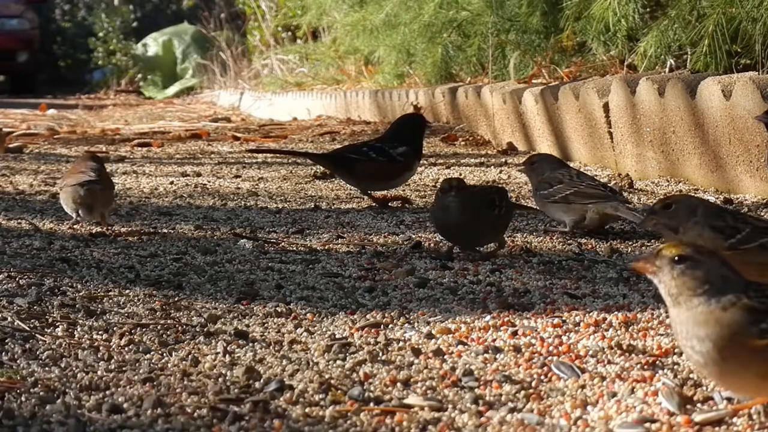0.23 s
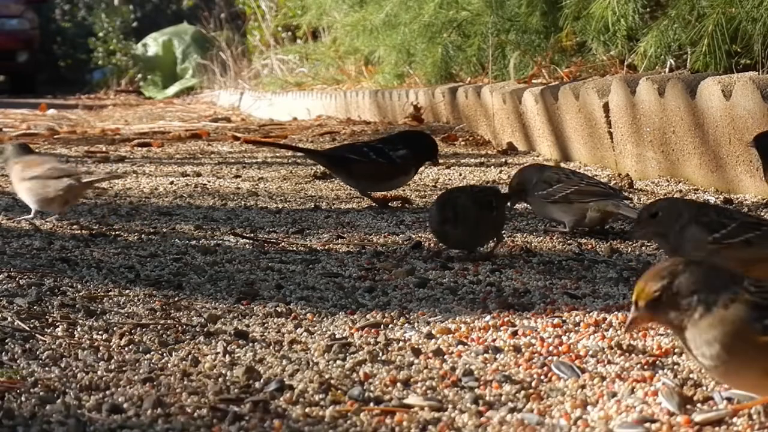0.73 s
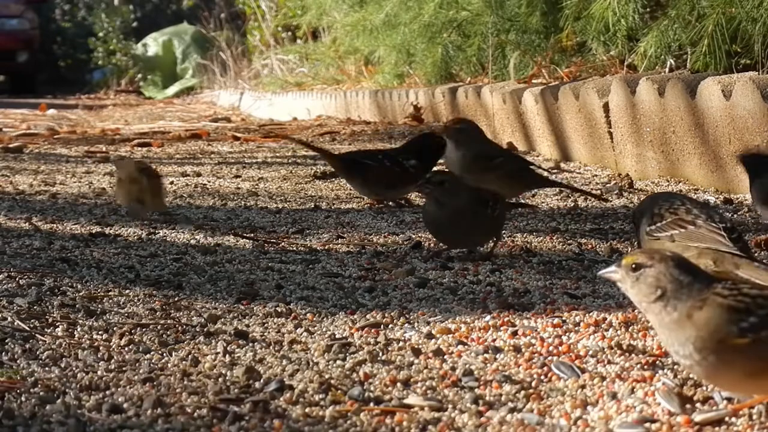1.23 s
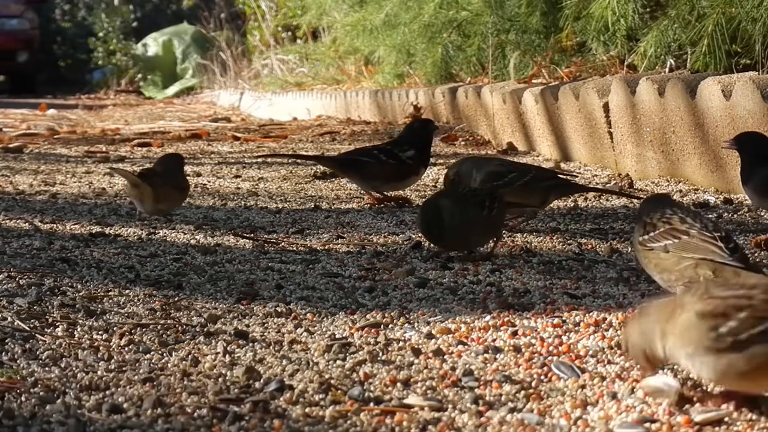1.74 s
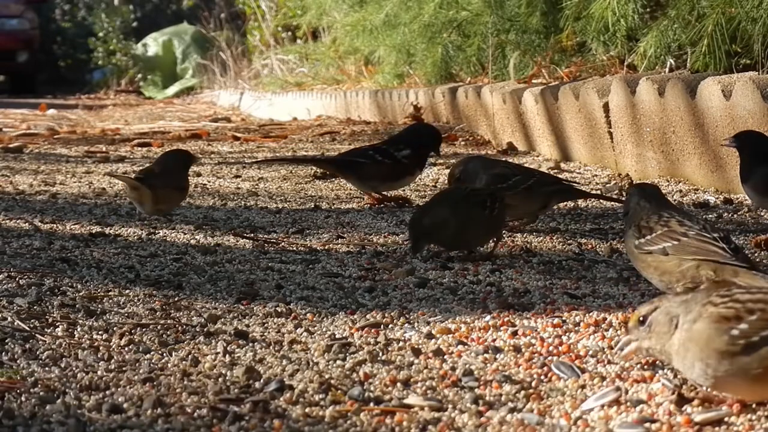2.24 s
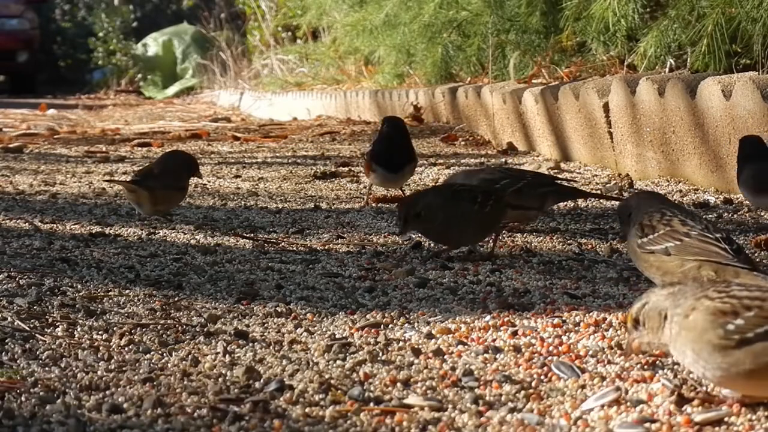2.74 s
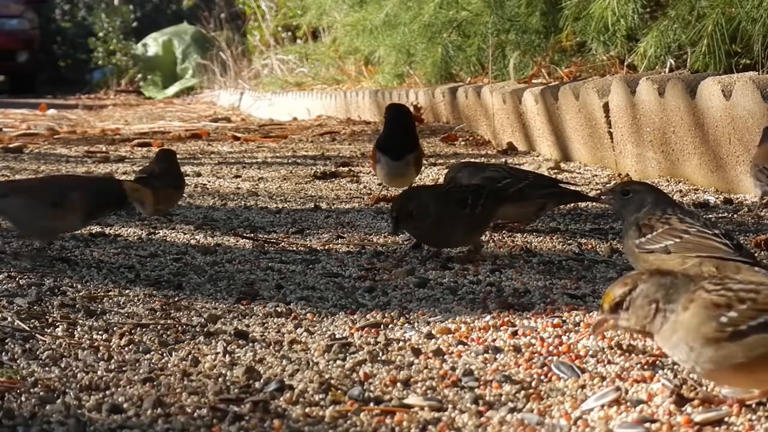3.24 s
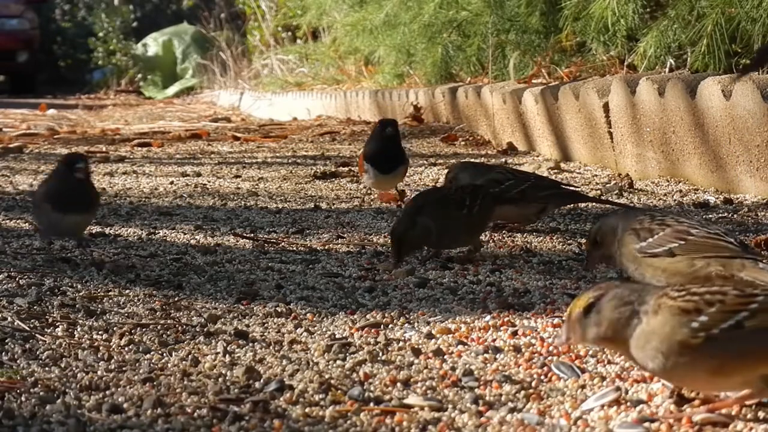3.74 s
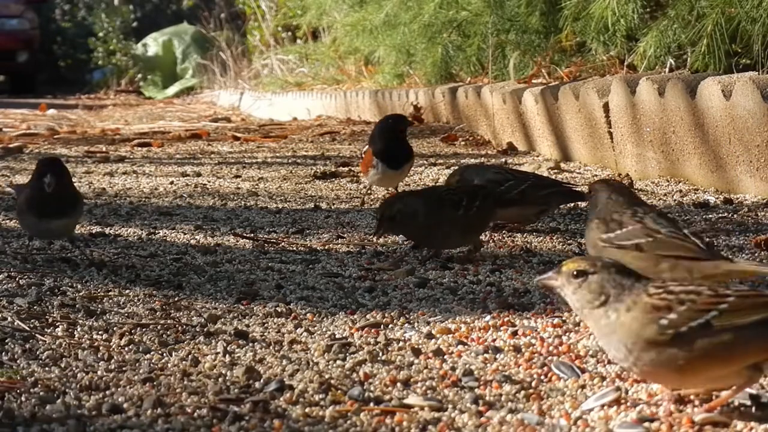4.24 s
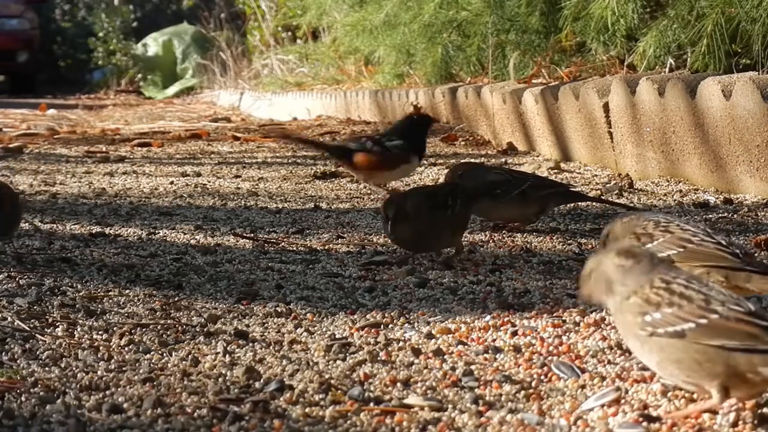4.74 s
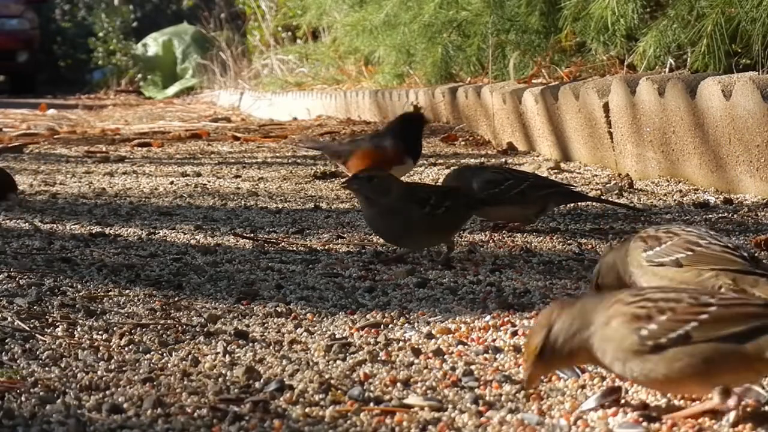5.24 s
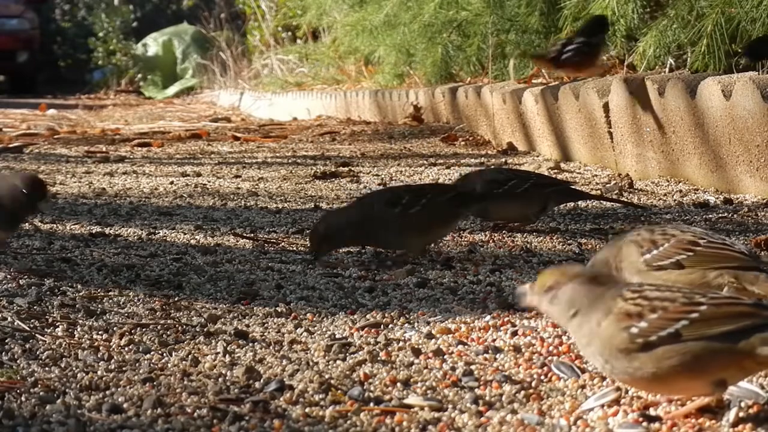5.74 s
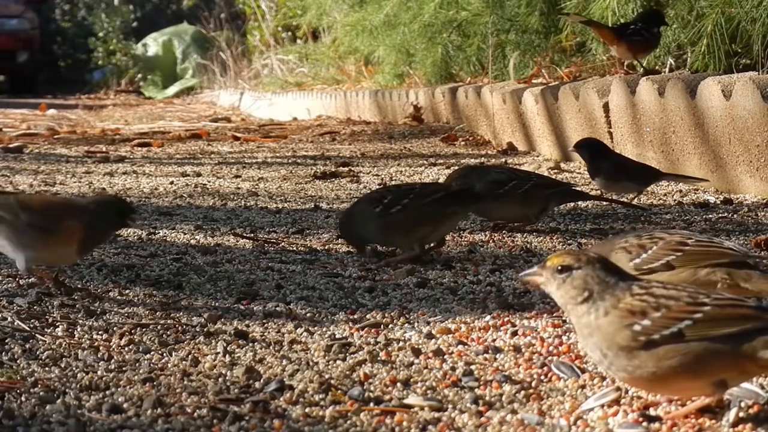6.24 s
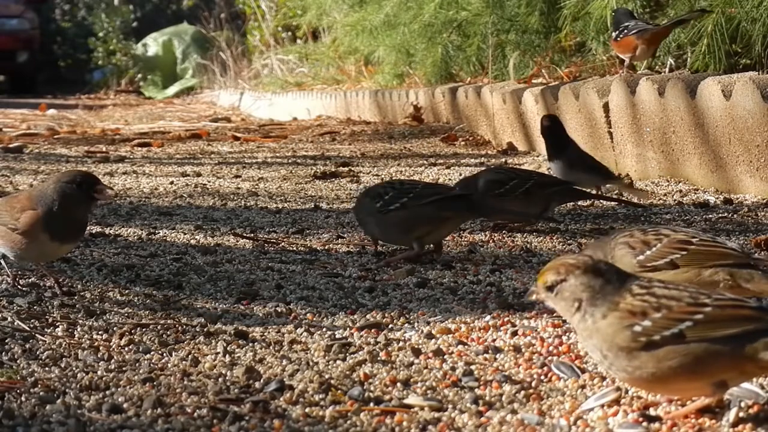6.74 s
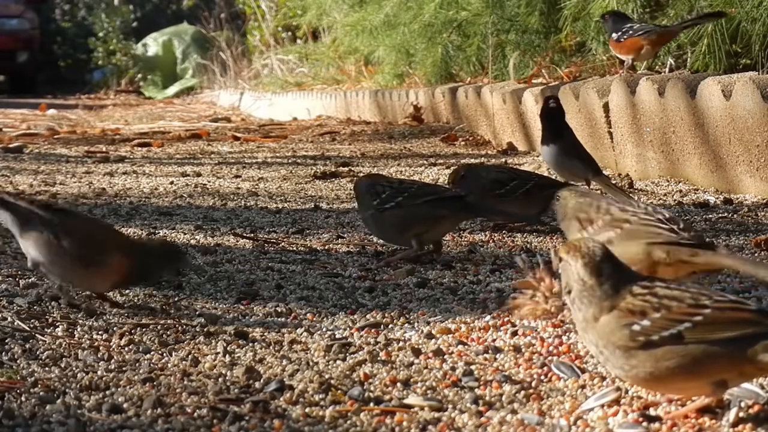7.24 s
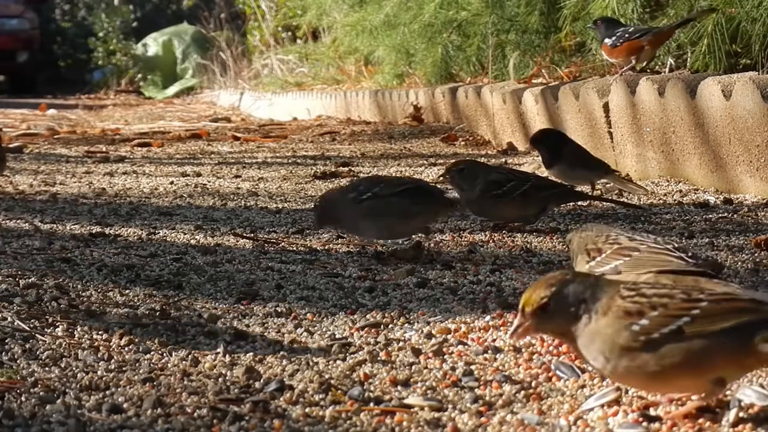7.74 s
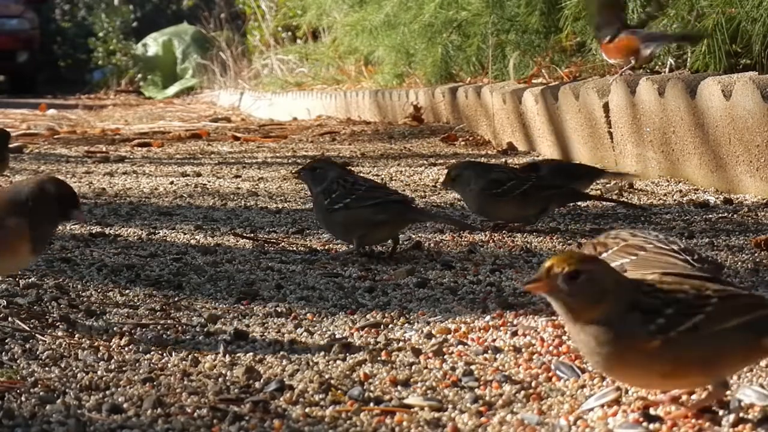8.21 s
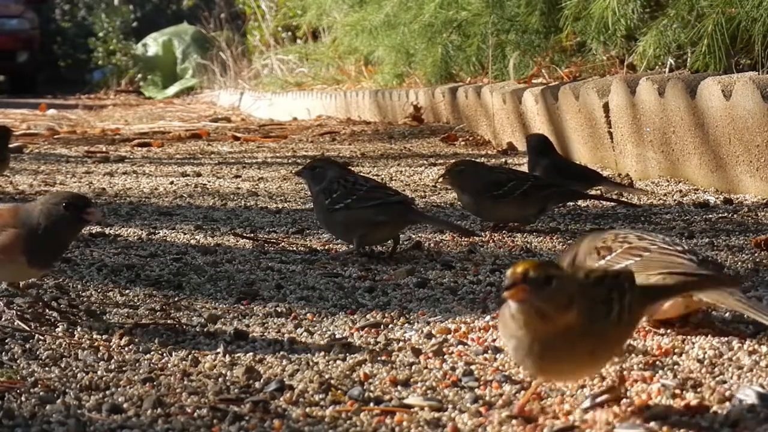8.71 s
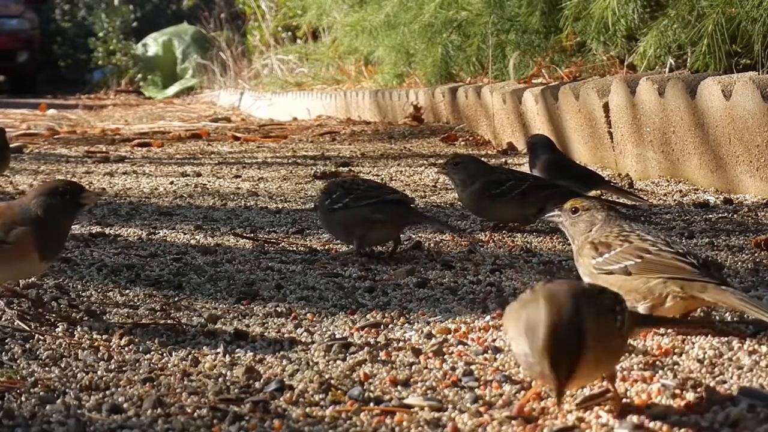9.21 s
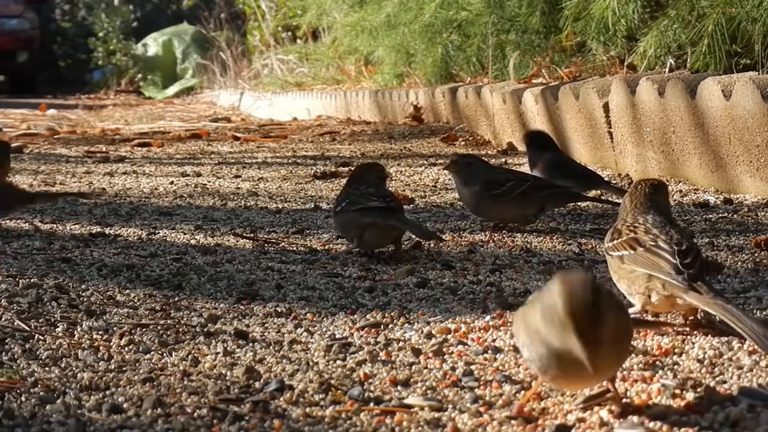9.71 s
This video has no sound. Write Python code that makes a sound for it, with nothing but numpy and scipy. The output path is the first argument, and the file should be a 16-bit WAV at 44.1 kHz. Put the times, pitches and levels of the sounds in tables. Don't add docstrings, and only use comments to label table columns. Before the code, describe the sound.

A quick flutter past the microphone, then beaks tick on scattered seed, gravel rustles, and faint high chips and seeps sound above a hissy background.

```python
import sys
import numpy as np
from scipy import signal
from scipy.fft import rfft, irfft, next_fast_len
from scipy.io import wavfile

SR = 44100
rng = np.random.default_rng(int(sys.argv[2]) if len(sys.argv) > 2 else 0)


def dump_mix(stems):
    frames = np.atleast_2d(stems).T
    limited = np.clip(frames, -1, 1)
    pcm = np.round(limited * 32767).astype(np.int16)
    wavfile.write(sys.argv[1], SR, pcm)


def gain_from_db(level_db):
    decades = np.asarray(level_db, float) / 20
    return 10 ** decades


N = 439677


def in_time(rows):
    times_s, *columns = np.transpose(rows)
    return [np.interp(np.arange(N) / SR, times_s, column) for column in columns]


def at_hz(points):
    hz = np.maximum(np.fft.rfftfreq(next_fast_len(N), 1 / SR), 1)
    table_hz, values = np.transpose(points)
    return np.interp(np.log(hz), np.log(table_hz), values)


def colour(x, spectrum):
    size = next_fast_len(N)
    y = irfft(rfft(x, size) * gain_from_db(at_hz(spectrum)), size)[..., :N]
    return y / np.sqrt(np.mean(y ** 2))


def butter(x, order, hz, kind):
    return signal.sosfilt(signal.butter(order, hz, kind, fs=SR, output="sos"), x)


def drift(rate_hz):
    r = np.exp(-2 * np.pi * rate_hz / SR)
    slow = signal.lfilter([1], [1, -2 * r, r * r], rng.standard_normal(N + SR))[SR:]
    return slow / slow.std()


def rounded(size):
    return np.sqrt(np.sin(np.linspace(0, np.pi, size)) + 1e-9)


def tone(hz):
    return np.sqrt(2) * np.sin(2 * np.pi * np.cumsum(hz) / SR)


# pitch_hz, likeness (0 to 1)
LIKENESS = [(700, .2), (1200, .88), (1700, .8), (2300, .46), (3300, .45), (5000, .45), (7400, .08),
            (10500, .3), (14000, .1)]


def wide_noise():
    size = next_fast_len(N)
    alike = np.clip(at_hz(LIKENESS), 0, 1)
    mid, side = rfft(rng.standard_normal((2, size)))
    return irfft(np.sqrt(1 + alike) * mid + np.sqrt(1 - alike) * side * [[1], [-1]], size)[:, :N]


def garden(x, echo_db, far_share=0.82):
    t = np.arange(int(.2 * SR)) / SR
    dying = gain_from_db(-700 * t) + far_share * gain_from_db(-180 * t)
    cloud = rng.standard_normal((2, len(t))) * dying * (t > .001)
    cloud *= gain_from_db(echo_db) / np.sqrt(np.sum(cloud ** 2, axis=1, keepdims=True))
    return x + signal.fftconvolve(x * np.ones((2, 1)), cloud, axes=1)[:, :N]


def ring(clicks, hz, t60_s):
    r, w = gain_from_db(-60 / (t60_s * SR)), 2 * np.pi * hz / SR
    return signal.lfilter([0, np.sin(w)], [1, -2 * r * np.cos(w), r * r], clicks + 1e-18)


# start_s, knock_db, husk_db, snap_db, tip_db
KNOCKS = [(1.6264, -53, -58, -35, -30.5), (8.858, -39.5, -60, -35, -58), (1.995, -40.5, -53, -56, -56),
          (3.9222, -32.5, -58, -29, -29.5), (4.0936, -51, -49, -35, -58), (4.439, -40.5, -44, -50, -50.5),
          (4.613, -59, -55, -39, -39), (5.594, -39, -42, -48, -33.5), (6.0688, -45, -47, -40, -30.5),
          (6.238, -38.5, -46, -29, -35.5), (6.6197, -39, -53, -38, -37), (7.3871, -37, -54, -37, -46),
          (7.8233, -50, -60, -40, -56), (7.899, -35.5, -40.5, -40, -56), (8.5647, -41, -45, -50, -42),
          (8.5938, -45, -48, -42, -44), (9.3165, -37, -47, -36, -36), (9.4353, -49, -50, -40, -41)]
# start_s, level_db, pitch_hz
TICKS = [(.1949, -41, 4600), (.2514, -47, 12400), (.2666, -35.5, 11000), (.288, -39, 13900),
         (.3266, -42.5, 11000), (0.58, -47, 2750), (2.248, -41, 11000), (2.547, -44, 11000),
         (3.2566, -46.5, 11000), (3.34, -42.5, 4600), (3.6995, -36.5, 11000), (3.828, -41, 10190),
         (4.0405, -54, 4600), (4.0734, -44, 13900), (4.282, -51, 11000), (4.3024, -38, 11000),
         (4.5676, -37, 11000), (5.72, -41, 11000), (5.9728, -43, 13900), (6.0536, -49, 4600),
         (6.2722, -37, 10900), (6.5705, -37, 11000), (7.228, -43, 11000), (7.342, -35.5, 4400),
         (8.235, -37, 11000), (.873, -41, 5300), (8.6442, -39, 11000), (8.784, -40, 11000),
         (8.866, -45, 2750), (8.748, -46, 4600), (0.13, -36, 13000), (8.8617, -36, 11000),
         (9.2245, -39, 11000), (9.23, -38, 11000), (9.189, -45, 4600), (9.402, -44, 2750),
         (1.627, -31, 8300), (3.9215, -47, 8300), (1.6272, -44, 2000), (6.62, -37.5, 2000),
         (8.5653, -49.5, 2000), (9.3165, -38, 2100), (9.4343, -36.5, 2000), (1.996, -40.5, 2000),
         (0.037, -27, 11000), (.0365, -34, 6204), (.045, -36, 10900), (.133, -31, 13000),
         (0.139, -40, 4950), (.156, -37, 13500), (5.812, -47, 11000), (8.39, -43, 11000),
         (8.235, -42, 6500), (.145, -34, 13000), (4.041, -42, 10000), (4.335, -42, 11000),
         (4.355, -44, 11000), (7.3877, -43, 2000)]


def strikes():
    thud_db, shell_db = -9, -12
    tick_db_per_octave = 29
    hard = [(s, knock + thud_db, knock, husk, snap + shell_db, snap, tip)
            for s, knock, husk, snap, tip in KNOCKS]
    mode_octaves = np.log2(np.array(SEED)[:, 0])
    light = []
    for s, level_db, hz in TICKS:
        octaves_away = np.abs(mode_octaves - np.log2(hz))
        light.append((s, *(level_db - tick_db_per_octave * octaves_away)))
    return np.array(hard + light)


# pitch_hz, level_db, t60_s (time to die by 60 dB)
SEED = [
    (2000, 2, .004),
    (2750, 4, .0045),
    (4500, 5, .003),
    (8300, 3, .003),
    (11000, 2.5, .0045),
    (13900, 3.5, .003),
]


def pecks():
    rows, out = strikes(), np.zeros(N)
    start_s = rows[:, 0]
    chance = rng.random((len(rows), 8))
    for mode, (hz, mode_db, t60_s) in enumerate(SEED):
        strike_db = rows[:, 1 + mode] + mode_db
        clicks = np.zeros(N)
        for j, crumble_db in enumerate((0, -10, -14)):
            delay_s = .001 * j * (.6 + chance[:, j])
            at = np.round((start_s - .0002 + delay_s) * SR).astype(int)
            sign = np.sign(chance[:, 3 + j] - .5)
            np.add.at(clicks, at, gain_from_db(strike_db + crumble_db) * sign)
        rung = ring(clicks, hz, t60_s)
        rung = rung + .4 * ring(clicks, 1.1 * hz, t60_s) + .6 * ring(clicks, .85 * hz, t60_s)
        out += butter(rung, 2, [.7 * hz, min(1.3 * hz, 17000)], "band")
    return butter(out, 3, 1500, "high")


# time_s, level_db of wing and grit
TAKEOFF = [
    (0, -39),
    (.012, -44),
    (.02, -33.5),
    (.038, -34.5),
    (.042, -44),
    (.122, -46.5),
    (.135, -47.5),
    (.175, -47.5),
    (.244, -54),
    (.4, -71.5),
]
# peak_s, level_db, dying_s, dull_db (duller part against the bright)
HOPS = [(.304, -53, 0.18, -2), (0.413, -54, 0.14, 0), (.663, -56.5, 0.15, 0.5), (.798, -56, 0.55, -1),
        (1.05, -57.5, 0.98, -1.5), (1.281, -56, 0.1, 0.5), (1.541, -55.5, .12, -0.5),
        (1.75, -56.5, 0.73, -0.5), (1.961, -57, 0.16, -4.5), (2.2, -59.5, 0.4, -1),
        (2.549, -52.5, 0.047, 3), (2.804, -60, 0.15, 1), (2.913, -53.5, 0.18, -8.5),
        (3.317, -56.5, 0.12, -3), (3.502, -52, 0.044, 0), (3.566, -54.5, 0.66, -2), (4.101, -57, 0.069, -8),
        (4.307, -49, 0.54, -2.5), (4.61, -61, 0.21, -4), (4.904, -59.5, 0.18, -2.5),
        (5.86, -61, 0.58, -11.5), (6.068, -61, 0.1, -7), (6.236, -49.5, 0.07, -5.5),
        (7.38, -50.5, 0.089, -4.5), (6.575, -59, 0.091, -6), (6.859, -62.5, 0.49, 2.5),
        (7.144, -55.5, 0.15, 1), (7.239, -51, 0.31, 0.5), (8.231, -57, 0.038, 5.5), (8.79, -50, 0.44, -1.5),
        (8.862, -46.5, 0.13, -6), (9.17, -48.5, 0.09, -11), (9.189, -40.5, 0.094, -10), (.14, -48, .05, -4),
        (9.508, -54, 0.96, -1), (9.646, -45, 0.038, -3.5)]


def stirring():
    flock_db, flock_dull_db, wing_dull_db = -64.5, 2.5, -2.5
    rise_share, fall_db = 0.19, 21.5
    scatter_db, scatter_s, scatter_dull_db = -21, 0.06, -3
    t = np.arange(N) / SR
    wing = gain_from_db(2 * in_time(TAKEOFF)[0])
    bright = gain_from_db(2 * flock_db) + wing
    dull = gain_from_db(2 * (flock_db + flock_dull_db)) + wing * gain_from_db(2 * wing_dull_db)
    thrown = [(s, tip_db + scatter_db, scatter_s, scatter_dull_db) for s, *_, tip_db in KNOCKS]
    for s, level_db, dying_s, dull_db in HOPS + thrown:
        near = slice(max(round((s - dying_s) * SR), 0), round((s + 2 * dying_s) * SR))
        late = (t[near] - s) / dying_s
        power = gain_from_db(2 * (level_db - fall_db * np.maximum(late, -late / rise_share)))
        bright[near] += power
        dull[near] += power * gain_from_db(2 * dull_db)
    return np.sqrt(bright), np.sqrt(dull)


# start_s, length_s, rise_db (above the rustle)
SCRATCHES = [(.042, .006, 6), (.055, .008, 4), (.13, .005, 8), (.138, .003, 8), (.142, .003, 7),
             (.145, .003, 7), (.154, .004, 6), (9.1865, .006, 10), (9.2065, .004, 5), (9.2235, .004, 9),
             (9.228, .005, 10), (9.239, .005, 5)]
# start_s, length_s, level_db
BRUSHES = [(0.127, 0.064, -50), (5.602, .1, -61.5), (6.036, 0.059, -54), (6.21, 0.044, -58),
           (7.22, .05, -58), (7.35, .05, -58), (3.89, .06, -55), (4.28, .05, -56)]
# pitch_hz, level_db (per Hz)
GRIT_TOP = [(10500, -29.5), (12200, -3), (13300, 0), (14200, -2), (14500, -14), (15200, -4), (16000, -8)]
# pitch_hz, level_db (per Hz)
GRIT_BRIGHT = [(7000, -43), (9400, -9.5), (10200, -1), (11000, 2), (12300, -6.5), (13500, -4), (14200, -4),
               (14500, -14), (15200, -6), (16000, -9)]
# pitch_hz, level_db (per Hz)
GRIT_DULL = [(1200, -35), (2000, -6.5), (3000, -2), (4500, -2.5), (6700, -2), (7500, -3), (8500, -6.5),
             (10000, -20)]


def rustle():
    bright, dull = stirring()
    scratch_db, brush = np.zeros(N), np.zeros(N)
    for s, length_s, rise_db in SCRATCHES:
        size = int(length_s * SR)
        scratch_db[round(s * SR):][:size] = rise_db * rounded(size)
    for s, length_s, level_db in BRUSHES:
        size = int(length_s * SR)
        brush[round(s * SR):][:size] = gain_from_db(level_db) * np.hanning(size)
    sizes = gain_from_db(2.6 * np.minimum(rng.exponential(1, N), 5)) * rng.choice([-1, 1], N)
    grains_per_s = 2500 * gain_from_db(2.5 * drift(60))
    grains = sizes * (rng.random(N) < grains_per_s / SR)
    grit = (grains / grains.std() * .65 + wide_noise()) * gain_from_db(1.5 * drift(120))
    top_grit = brush * colour(grit, GRIT_TOP)
    sharp = gain_from_db(scratch_db) * bright * colour(grit, GRIT_BRIGHT)
    soft = gain_from_db(0.49 * scratch_db - 0.5) * dull * colour(grit, GRIT_DULL)
    return top_grit + sharp + soft


# sweep_s (when it passes 5 kHz), sweep_db, held_db (start against sweep),
# slowness (times), fade_db (low end)
CHIPS = [(1.961, -47.5, -16, 1.26, 0.5), (2.083, -48, -9.5, 1.05, -12.5), (2.2, -50.5, -6, 1.35, -1.5),
         (2.331, -47, -14, 1.35, -6), (2.454, -49, -8.5, 1.54, -0.5), (2.598, -51.5, -15, 1.15, -2.5),
         (4.554, -48.5, -7.5, 0.63, -24.5), (4.704, -55, 0, 1.16, -1.5), (4.815, -48, -7, 1.05, -0.5),
         (4.941, -48, -12.5, 1.44, -5.5), (5.081, -50, -14, 1.6, -9.5), (8.303, -49, -4, 0.87, -17),
         (8.436, -66, 4.5, 1.25, -11.5), (8.555, -48, -14.5, 1.16, -15.5), (8.683, -48.5, -12.5, .95, -10)]
# time_s (from the 5 kHz point), pitch_hz
CHIP_SHAPE = [(-.034, 6100), (-.012, 5950), (-.005, 5500), (0, 5000), (.008, 4400), (.014, 3950)]


def chips():
    shape_s, shape_hz = np.transpose(CHIP_SHAPE)
    out, unsteady_hz = np.zeros(N), 60 * drift(300)
    for s, sweep_db, held_db, slowness, fade_db in CHIPS:
        t = np.arange(shape_s[0], shape_s[-1], 1 / SR / slowness)
        i = round((s + shape_s[0] * slowness) * SR)
        hz = np.interp(t, shape_s, shape_hz) + unsteady_hz[i:i + len(t)]
        course_db = np.interp(t, [-.016, -.009, -.002, .003, .017],
                              [held_db, held_db / 2 - 5, 0, 0, fade_db])
        out[i:i + len(t)] += gain_from_db(sweep_db + course_db) * rounded(len(t)) * tone(hz)
    out = out * gain_from_db(-1.5 + 2.5 * drift(260))
    wall = gain_from_db(-8) * np.roll(out, round(.011 * SR))
    return garden(out + wall, echo_db=-.5, far_share=1.1)


def note(length_s, start_hz, end_hz, bend, wobble_hz):
    u = np.linspace(0, 1, int(length_s * SR))
    hz = start_hz + (end_hz - start_hz) * u ** bend + wobble_hz[:len(u)]
    return rounded(len(u)) * tone(hz)


# start_s, length_s,
# pitch_hz (at the start), level_db
SEEPS = [(.013, 0.026, 6800, -44), (.014, .026, 13240, -45), (.13, .03, 4940, -51.5),
         (7.313, 0.033, 6760, -59.5), (5.715, 0.074, 7250, -59.5), (5.75, .055, 7900, -62),
         (3.491, 0.055, 7150, -62.5), (3.501, 0.047, 8000, -65), (8.655, 0.065, 5980, -63.5),
         (0.615, 0.057, 9720, -54), (0.625, 0.09, 9030, -57), (2.464, 0.074, 6860, -60.5),
         (2.557, .055, 6120, -60), (2.558, 0.07, 6940, -66.5), (2.658, 0.037, 6900, -61.5),
         (2.736, 0.041, 6770, -59.5), (3.478, 0.087, 6800, -52), (3.484, 0.046, 7500, -61.5),
         (3.568, 0.059, 6760, -61), (4.505, 0.05, 6200, -59.5), (5.692, 0.034, 6820, -56),
         (5.724, 0.047, 6770, -47.5), (5.796, 0.027, 6700, -60.5), (5.715, 0.076, 7640, -57.5),
         (6.072, 0.13, 6400, -64.5), (6.933, 0.046, 6750, -63.5), (7.019, .06, 6740, -60),
         (7.108, 0.045, 6900, -60), (7.202, 0.086, 6870, -52), (7.277, 0.046, 7100, -58),
         (7.209, 0.05, 7500, -58), (5.996, 0.092, 6200, -64.5), (7.754, 0.068, 5810, -56.5),
         (7.782, 0.034, 6190, -57), (8.038, 0.097, 6110, -56.5), (8.342, 0.036, 6150, -68.5),
         (9.786, 0.052, 6370, -66)]
# start_s, length_s, pitch_hz (at the start), level_db
UPSEEPS = [(2.165, 0.037, 6700, -67), (2.385, 0.03, 6800, -62), (6.85, 0.051, 7150, -59.5)]


def seeps():
    sag_hz_per_s, rise_hz_per_s = -1400, 14000
    out, unsteady_hz = np.zeros((2, N)), 95 * drift(350)
    calls = [(*row, sag_hz_per_s) for row in SEEPS] + [(*row, rise_hz_per_s) for row in UPSEEPS]
    for s, length_s, start_hz, level_db, glide in calls:
        i, end_hz = round(s * SR), start_hz + glide * length_s
        bend = .45 if glide < 0 else 1
        call = gain_from_db(level_db) * note(length_s, start_hz, end_hz, bend, unsteady_hz[i:])
        pan_db = 6 * (5.6 < s < 5.9)
        out[:, i:i + len(call)] += call * gain_from_db(np.array([[pan_db / 2], [-pan_db / 2]]))
    throb_hz = 52 + 8 * drift(9.3)
    throb_db = 1.8 * np.sin(2 * np.pi * np.cumsum(throb_hz) / SR)
    return garden(out * gain_from_db(2.0 * drift(150) + throb_db), echo_db=-3.5)


# time_s, level_db, weight_db (extra low end)
TRAFFIC = [(0.0, -53.5, 3.5), (1.61, -51, 0.5), (1.91, -50, 0.5), (2.15, -50, 0), (3.3, -52.5, 0),
           (3.58, -51.5, 9), (3.8, -51.5, 5.5), (4.5, -53, 3), (4.97, -51.5, 0), (5.3, -54, 7.5),
           (5.83, -54, 0), (6.72, -54.5, 1), (7.05, -55, -1.5), (8.39, -51.5, -5.5), (8.77, -49.5, -9.5),
           (9.16, -52.5, -6), (9.52, -51.5, -2), (9.97, -53, -2)]
# pitch_hz, level_db (per Hz)
ROAD = [(600, -77.5), (800, -43.5), (1000, -29.5), (1300, -17), (1650, -3.5), (1850, 0), (2300, -3),
        (3300, -10.5), (5000, -16), (8000, -28), (16000, -45)]


def traffic():
    level_db, weight_db = in_time(TRAFFIC)
    roar = colour(wide_noise(), ROAD)
    low = signal.sosfiltfilt(signal.butter(2, 1600, fs=SR, output="sos"), roar)
    return gain_from_db(level_db + 1.5 + 0.73 * drift(14.0)) * (roar + (gain_from_db(weight_db) - 1) * low)


def scene():
    return pecks() + rustle() + chips() + seeps() + traffic()


# pitch_hz, level_db (per Hz)
HISS = [(1000, -38), (2500, -3.5), (5000, -1), (6700, -3.5), (8800, -3.5), (10900, -2), (12500, -7),
        (14200, -4.5), (14400, -20), (15000, -17), (15150, -4.5), (16000, -3.5)]


def hiss():
    return gain_from_db(-57.5) * colour(wide_noise(), HISS)


# time_s, level_db
WHINE = [
    (0, -68),
    (.17, -66),
    (.3, -58.5),
    (9.97, -58.5),
]


def camera_whine():
    level_db = in_time(WHINE)[0] + 0.7 * drift(8.6)
    return gain_from_db(level_db) * tone(np.full(N, 14835.3)) * gain_from_db(np.array([[-3.3], [2.4]]))


def faint_low_noise():
    low = butter(5 * rng.standard_normal(N), 4, 750, "low")
    return gain_from_db(-100) * low * np.array([[1], [-1]])


def band_limit(x):
    return signal.sosfilt(signal.butter(12, 16790, fs=SR, output="sos"), x)


# pitch_hz, lean_db (left minus right)
LEAN = [(700, 5), (1300, 3.5), (2300, 2.5), (4300, 1.5), (7000, 0.25), (10000, -2.5), (12300, 1),
        (13800, -7.5), (15500, -5)]
# pitch_hz, lag_radians (left behind right)
LEFT_LAG = [(700, 0), (1500, .1), (2750, .33), (4800, 1.3), (7000, 1.5), (8700, 2.9), (11000, 1.5),
            (12000, 4), (13300, 6), (16000, 5.8)]


def record(dry):
    size = next_fast_len(N)
    spectrum = rfft(dry + hiss(), size)
    half = gain_from_db(at_hz(LEAN) / 2) * np.exp(-.5j * at_hz(LEFT_LAG))
    ports = irfft(spectrum * [half, 1 / half], size)[:, :N]
    ports = butter(ports, 8, 800, "high")
    ports = signal.sosfilt(signal.ellip(10, .5, 60, 15750, fs=SR, output="sos"), ports)
    return band_limit(ports + camera_whine() + faint_low_noise())


dry = scene()
out = record(dry)
dump_mix(out)
```